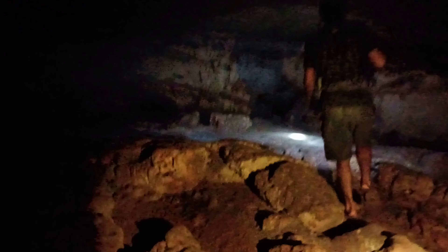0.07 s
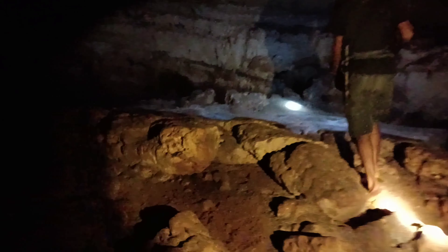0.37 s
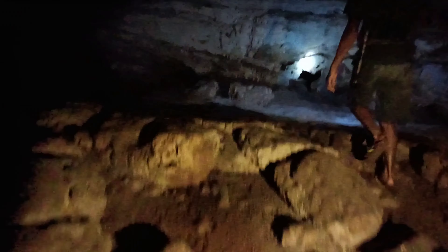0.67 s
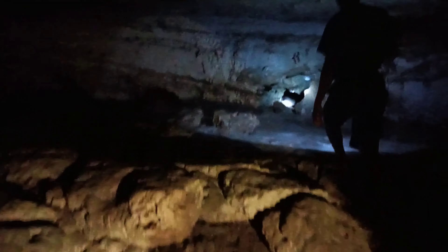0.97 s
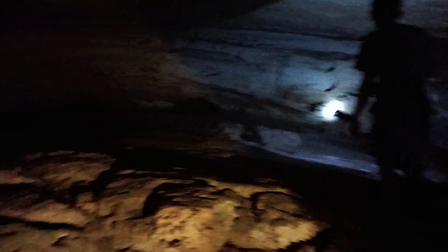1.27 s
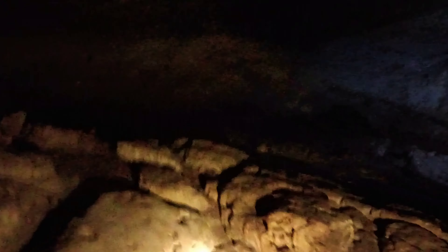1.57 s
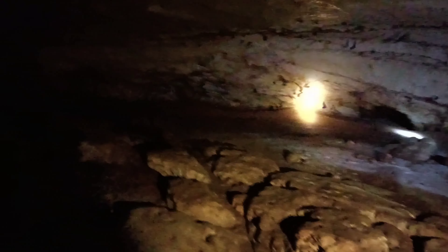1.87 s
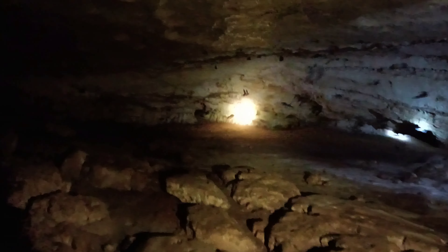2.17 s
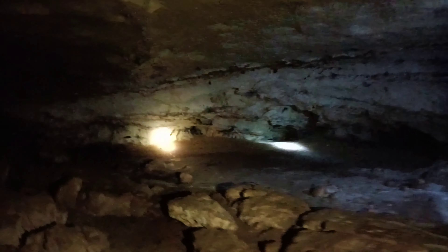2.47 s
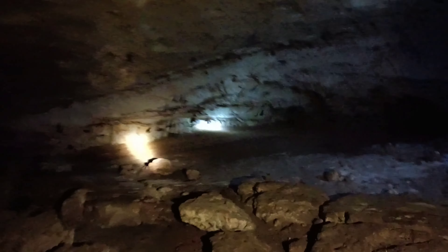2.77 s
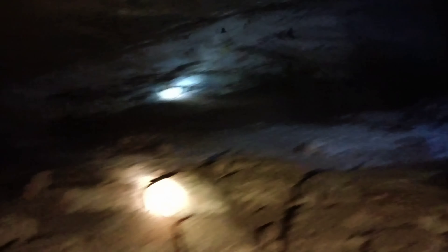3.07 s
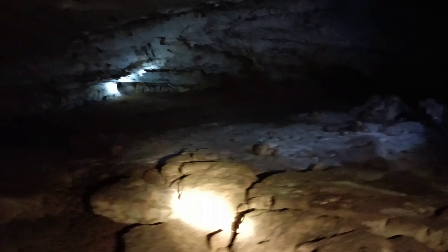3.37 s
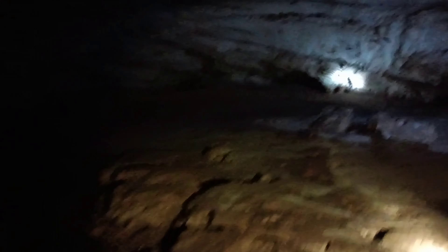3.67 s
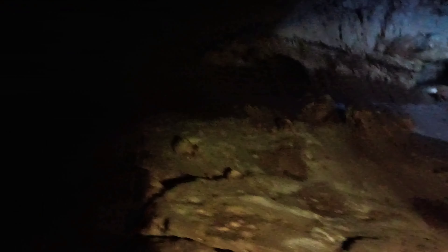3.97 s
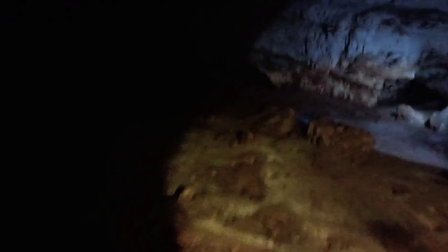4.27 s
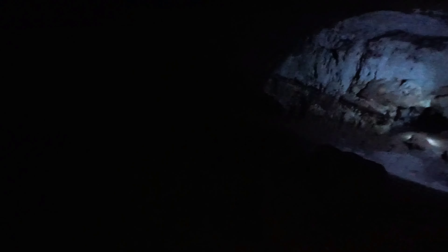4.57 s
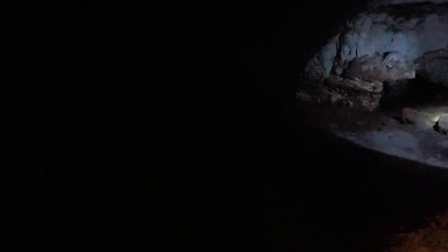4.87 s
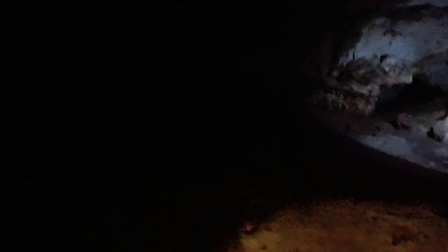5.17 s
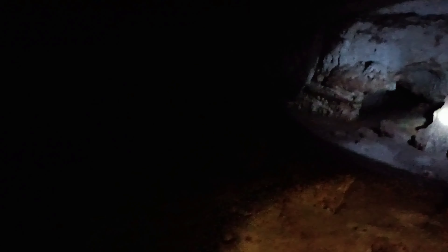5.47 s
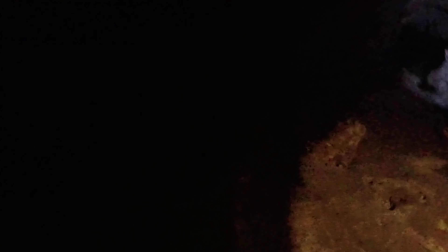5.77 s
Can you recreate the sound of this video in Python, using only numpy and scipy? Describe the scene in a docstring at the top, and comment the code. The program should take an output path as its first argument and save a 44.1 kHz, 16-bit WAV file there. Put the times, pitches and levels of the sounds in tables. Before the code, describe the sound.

Someone shifts on a loose rocky cave floor, with rustling clothing, gritty scrapes and stones clacking underfoot over a quiet rumble.

```python
"""Someone shifts about on the loose rock floor of a low cave, close to the microphone.
First clothing slides in thin whispers, with faint squeals, a few scuffs and the clack of small stones.
After three seconds the soles drag harder over the grit. Then three footfalls rock larger stones,
the second with a low boom, and it ends on small ticks and a last rustle of clothes.
All along, the cave answers stones and soles with a short, dark tail over a quiet rumble."""
import sys
import numpy as np
from scipy import signal
from scipy.fft import rfft, irfft
from scipy.io import wavfile
from scipy.ndimage import uniform_filter1d, map_coordinates

SR = 44100
rng = np.random.default_rng(int(sys.argv[2]) if len(sys.argv) > 2 else 0)


def dump_mix(stems):
    """Bounce the given channels to the path in sys.argv[1] as a 16-bit WAV at rate SR."""
    frames = np.atleast_2d(stems).T  # one column per channel
    limited = np.clip(frames, -1, 1)  # hard clip at full scale
    pcm = np.round(limited * 32767).astype(np.int16)
    wavfile.write(sys.argv[1], SR, pcm)


N = 261513

# tone colour of crushed grit: (frequency [Hz], level [dB])
GRIT_SPECTRUM = [(150, -25), (500, -6.5), (900, -13), (1500, -8.5), (2900, 3), (8000, -0.5), (14500, -4),
                 (16000, -24)]


def stone_knocks(lag_s=0.00021, crunch_t60=0.06, crunch_tilt_db=-4.5, contact_s=0.00016, low_hz=135):
    """A stone is driven against its bed: it rings briefly and crushes the grit beneath it."""
    # ringing modes of each stone: (frequency [Hz], level [dB], t60 [s])
    stone_modes = { "slab": [(172, -4.5, .09), (355, -14, .04), (485, 1.5, .038), (565, 2, .038),
                   (995, 3.5, .024), (1150, 3.5, .018)], "block": [(178, -3, .11), (280, -3, .05),
                   (430, -7, .03), (780, -6, .022), (1060, 2, .02), (1480, -3, .016)],
                   "plate": [(292, -15.5, .05), (499, -4, 0.054), (834, 2.5, 0.023), (1100, -6, 0.016),
                   (2120, -5.5, 0.02)], "cobble": [(638, -10, 0.2), (1800, -1, 0.03), (2340, 8, 0.028),
                   (2560, 8, 0.03), (3000, 6, 0.024)], "pebble": [(710, 0, .045), (3300, 2, .024),
                   (3560, 1, .022)], "chip": [(5750, 0, .014), (6300, 0, .01)], "flake": [(430, -6, 0.029),
                   (1065, 3, 0.03), (3700, -7, 0.025)], "lump": [(559, 11, 0.066)]}
    # stone hits: (time [s], stone, knock [dB], crunch [dB], cave send [dB])
    hits = [ (0.3605, "cobble", -35, -37.5, -8), (0.5205, "chip", -33, -49, -11),
            (1.404, "pebble", -64, -52.5, -1.5), (1.632, "lump", -60.5, -59, -9),
            (3.136, "pebble", -50, -55, -3), (3.966, "flake", -38.5, -39.5, -13),
            (4.0225, "block", -25.5, -27.5, -8.5), (4.3665, "slab", -30.5, -24, -12),
            (4.3711, "slab", -14.7, -21, -15.5), (4.985, "plate", -29.5, -33, -14),
            (4.9905, "plate", -25, -30.5, -13), (5.061, "pebble", -40, -44, -17),
            (5.632, "flake", -58, -54, -8), (5.707, "chip", -49, -58, -5),
            (5.855, "block", -51.5, -47.5, -13)]
    direct, send = np.zeros((2, 2, N))
    t = np.arange(SR // 2) / SR
    age = np.maximum(t - np.array([[0], [lag_s]]), 0)  # the left microphone is nearer
    low_cut = signal.butter(2, low_hz, "high", fs=SR)  # a stone radiates little bass
    for s, stone, knock_db, crunch_db, send_db in hits:
        ring = sum(amp(db - 60 * age / t60) * np.sin(2 * np.pi * hz * age)
                   for hz, db, t60 in stone_modes[stone])
        knock = amp(knock_db) * signal.lfilter(*low_cut, ring)
        grit = stereo(grains(len(t), spread_db=1), GRIT_SPECTRUM, crunch_tilt_db)
        crunch = patchy(grit, depth_db=3, width_hz=220, length_s=0.024)
        hit = knock + amp(crunch_db - 60 * t / crunch_t60) * crunch
        hit *= np.expm1(-age / contact_s)  # the force builds over the contact time
        add(direct, s, hit)
        add(send, s, amp(send_db) * hit)
    return direct + amp(3.5) * cave(send)


def footfall_boom(s=4.372, air_db=-38, rubble_db=-32, rubble_t60=0.62):
    """The heaviest footfall shakes the rubble and wakes the chamber's lowest air resonances."""
    # air resonances: (frequency [Hz], level [dB], t60 [s])
    modes = [(33.36, -1, 1.4), (38.9, 0.0, 1.4), (57.8, -2, 1.1)]
    # rubble tone: (frequency [Hz], level [dB])
    colour = [(90, -11), (190, 3), (280, -10.5), (410, -1.5), (580, -4.5), (800, -9.5), (1500, -29)]
    t, out = np.arange(SR) / SR, np.zeros((2, N))
    air = sum(amp(db - 60 * t / t60) * np.sin(2 * np.pi * hz * t) for hz, db, t60 in modes)
    rubble = stereo(rng.standard_normal((2, SR)), colour) * amp(-60 * t / rubble_t60)
    attack = np.minimum(t / 0.008, 1)
    add(out, s, (amp(air_db) * air + amp(rubble_db) * rubble) * attack)
    return out


def sole_scuffs(cave_db=-10):
    """Each drag swells and fades as a stream of gritty grains; weight on the sole adds a lower grind."""
    # drags: (time [s], rise [s], fade [s], level [dB], brightness [dB/octave], relative grind [dB])
    drags = [ (0.265, 0.012, 0.044, -54.5, 0, -41), (0.378, 0.019, 0.11, -42.5, 3, -12.5),
             (0.979, 0.008, 0.068, -44.3, 4, -18), (1.448, 0.03, 0.09, -50.5, 0, -24.5),
             (2.441, 0.035, 0.097, -54, -0.5, -3), (3.296, .009, .056, -36, 1.6, -26),
             (3.351, .003, .016, -44, 0, -3), (3.54, 0.037, 0.013, -45.5, 1.5, -47),
             (3.642, .007, .024, -47, 0, -25), (3.692, .016, .036, -47.5, 1, -22),
             (3.949, 0.084, 0.032, -38.5, 1, -13), (4.101, 0.1, 0.07, -53, -5.5, -9),
             (4.335, 0.056, 0.039, -37.5, 1, -5), (4.541, 0.096, 0.038, -43, 8, -9.5),
             (4.605, .03, .032, -57, 0, 5), (4.893, .006, .06, -60, 2, -25),
             (4.951, 0.003, 0.006, -49, 1, -27.5), (4.955, 0.057, 0.008, -41.5, 6, -4),
             (5.015, .038, .05, -42, 2, -12), (5.519, 0.022, 0.12, -57, 4.5, 0.5),
             (5.808, 0.042, 0.04, -50, 2.5, 5)]
    # tone of grit under weight: (frequency [Hz], level [dB])
    grind_spectrum = [(100, -20), (200, 9.5), (450, -12), (750, -9), (1300, 0), (2200, 0), (5000, -17.5)]
    t, out = np.arange(SR // 2) / SR, np.zeros((2, N))
    for s, rise, fade, db, tilt_db, grind_db in drags:
        pressure = np.where(t < rise, t / rise, np.exp(-((t - rise) / fade) ** 2))
        cracks = grains(len(t), spread_db=0.8)
        grit = stereo(cracks, GRIT_SPECTRUM, tilt_db) + amp(grind_db) * stereo(cracks, grind_spectrum)
        grit = patchy(grit, depth_db=3.4, width_hz=240, length_s=0.035)
        grit *= flutter(len(t), depth_db=1.4, per_s=150)
        add(out, s, amp(db) * pressure * grit)
    return out + amp(cave_db) * cave(out)


def cloth_slides(attack_s=0.018, release_s=0.095, reference_hz=11300, wander_share=.006):
    """Threads tick over threads: a high band of hiss whose pitch glides with the sliding speed."""
    # cloth over cloth: (start [s], length [s], level [dB], start pitch [Hz], end pitch [Hz])
    strokes = [ (-0.01, 0.2, -51.5, 11100, 11400), (0.26, 0.24, -49.5, 12400, 11100),
               (0.592, 0.31, -51.5, 11200, 10600), (0.962, 0.21, -48.5, 10900, 11000),
               (1.256, 0.43, -49, 11040, 11100), (1.774, 0.07, -53.5, 11600, 10900),
               (2.075, 0.058, -57, 10000, 10100), (2.17, 0.13, -55, 11100, 11600),
               (2.374, 0.36, -57, 11500, 9600), (2.85, 0.15, -59, 9850, 9500),
               (3.074, 0.21, -62, 11100, 11700)]
    # tone of the hiss at the reference pitch: (frequency [Hz], level [dB])
    hiss_spectrum = [(1500, -27), (2400, -14.5), (6500, -17), (8500, -11.5), (10200, -9), (10900, 1),
                     (11700, 0), (12800, -2.5), (17000, -7.5)]
    now = np.arange(N) / SR
    level, glide = np.zeros(N), []
    for s, length, db, start_hz, end_hz in strokes:
        age = np.maximum(now - s, 0)
        catch = np.minimum(age / attack_s, 1)
        let_go = np.exp(-np.maximum(age - length, 0) / release_s)
        level += amp(db) * catch * let_go
        glide += [(s, start_hz), (s + length, end_hz)]
    ticks = stereo(grains(N, spread_db=-3), [(1, 0)])  # flat spectrum
    hz, t, z = signal.stft(ticks, SR, nperseg=512)
    wander = unit(uniform_filter1d(rng.standard_normal(len(t)), size=8))  # the hand slides unevenly
    pitch = np.interp(t, *np.transpose(glide)) * (1 + wander_share * wander)
    z *= amp(curve_at(hiss_spectrum, hz[:, None] * reference_hz / pitch))
    hiss = signal.istft(z, SR, nperseg=512)[1][:, :N]
    hiss = patchy(hiss, depth_db=3.4, width_hz=170, length_s=.035)
    return hiss * level * flutter(N, depth_db=1.3, per_s=63)


def body_rustle():
    """Soft, broad crinkling of clothes and dust that swells and fades with each shift of the body."""
    # body shifts: (centre [s], half length [s], level [dB])
    shifts = [ (2.93, 0.3, -62), (3.401, 0.11, -53.5), (3.87, 0.19, -57.5), (4.157, 0.21, -55.5),
              (4.6, 0.15, -59.5), (5.297, 0.096, -59), (5.422, 0.032, -60.5), (5.673, 0.13, -63),
              (5.92, 0.092, -46.5)]
    crinkle = stereo(grains(N, spread_db=2.7), GRIT_SPECTRUM, tilt_db=1)
    crinkle = patchy(crinkle, depth_db=3, width_hz=250, length_s=.04)
    t = np.arange(N) / SR
    level = sum(amp(db) * np.exp(-((t - s) / half) ** 2) for s, half, db in shifts)
    return crinkle * level * flutter(N, depth_db=1.2, per_s=110)


def friction_squeals(sag_share=0.0198):
    """Stick and slip too unsteady for a clean tone: a narrow band that swells, sags and fades."""
    # sliding surfaces catch: (centre [s], half length [s], pitch [Hz], width [Hz], level [dB])
    catches = [ (0.89, 0.075, 10300, 900, -55.5), (1.492, 0.032, 3020, 400, -54),
               (2.097, 0.03, 10300, 800, -57.5), (2.6, .4, 2450, 200, -72.5), (2.9, .05, 2480, 200, -68),
               (3.06, .055, 2340, 140, -66.5), (3.01, .024, 5300, 450, -60),
               (3.263, 0.053, 10800, 600, -57)]
    t, out = np.arange(SR) / SR - .5, np.zeros((2, N))
    bins = np.fft.rfftfreq(SR, 1 / SR)
    for s, half, hz, width, db in catches:
        peak_db = -20 * np.log10(1 + (2 * (bins - hz) / width) ** 2)
        band = stereo(rng.standard_normal((2, SR)), np.column_stack([bins, peak_db]))
        # as the slide slows, the pitch drops by sag_share in each half length
        sag = np.exp(-1j * np.pi * hz * sag_share * t ** 2 / half)
        squeal = (signal.hilbert(band) * sag).real
        add(out, s - .5, amp(db) * np.exp(-(t / half) ** 2) * squeal)
    return out


def cave(x):
    """Dense reflections from near rock; the treble dies first."""
    # decay times: (frequency [Hz], t60 [s])
    t60 = [(100, 1.0), (450, 0.42), (1000, 0.32), (3000, 0.25), (12000, 0.15)]
    colour = [(80, -9.5), (430, 7.5), (3000, 9.0)]  # (frequency [Hz], level [dB])
    hz, t, z = signal.stft(stereo(rng.standard_normal((2, SR)), colour), SR, nperseg=256)
    decay = amp(-60 * t / curve_at(t60, hz)[:, None])
    tail = signal.istft(z * decay, SR, nperseg=256)[1]
    tail *= np.clip((np.arange(tail.shape[1]) / SR - .004) / 0.0035, 0, 1)  # pre-delay, then fade-in
    return signal.fftconvolve(x[:1], tail / np.linalg.norm(tail[0]), axes=1)[:, :N]


def still_air(rumble_db=-59, hiss_db=-72):
    """Low rumble of the chamber and a faint even hiss."""
    # chamber rumble: (frequency [Hz], level [dB])
    rumble_spectrum = [(20, -2.5), (40, 4), (80, -2), (190, -5), (450, -9.5), (700, -20), (3000, -27.5)]
    # faint even hiss: (frequency [Hz], level [dB])
    hiss_spectrum = [(1000, 0), (16000, -2)]
    rumble = stereo(rng.standard_normal((2, N)), rumble_spectrum)
    rumble *= flutter(N, depth_db=1.5, per_s=5.054)
    hiss = stereo(rng.standard_normal((2, N)), hiss_spectrum)
    return amp(rumble_db) * rumble + amp(hiss_db) * hiss


def grains(size, spread_db):
    """Thousands of tiny fractures a second: noise whose strength jumps every 16 samples."""
    strength = amp(spread_db * np.minimum(rng.exponential(1, size // 16 + 1), 5))
    return rng.standard_normal((2, size)) * np.repeat(strength, 16)[:size]


def patchy(x, depth_db, width_hz, length_s):
    """Ever-changing contact points: brief narrow resonances come and go across the spectrum."""
    hz, t, z = signal.stft(x, SR, nperseg=512)
    grid = np.array(np.meshgrid(hz / width_hz, t / length_s, indexing="ij"))
    patches = map_coordinates(rng.standard_normal((128, 256)), grid, order=1, mode="grid-wrap")
    z *= amp(depth_db * patches)
    return unit(signal.istft(z, SR, nperseg=512)[1][:, :x.shape[1]])


def flutter(size, depth_db, per_s):
    """Randomly wavering gain, as of a surface that catches and slips."""
    steps = np.arange(size) / SR * per_s
    return amp(depth_db * np.interp(steps, np.arange(4096), rng.standard_normal(4096)))


def stereo(pair, spectrum, tilt_db=0):
    """Colours two signals and sets their stereo width: centred bass, wide middle, narrower treble."""
    # likeness of left and right: (frequency [Hz], correlation [-1 to 1])
    likeness = [(60, .99), (220, .92), (500, .65), (1100, -.2), (5000, 0), (7500, .55), (12000, .72)]
    hz = np.fft.rfftfreq(pair.shape[1], 1 / SR)
    same = np.clip(curve_at(likeness, hz), -.999, .999)
    mid, side = rfft(pair) * np.sqrt([1 + same, 1 - same])
    colour = amp(curve_at(spectrum, hz) + tilt_db * np.log2(np.maximum(hz, 500)))
    return unit(irfft(np.array([mid + side, mid - side]) * colour, pair.shape[1]))


def amp(db):
    """Decibels to gain."""
    return 10 ** (np.asarray(db) / 20)


def unit(x):
    """Scales to rms 1."""
    return x / np.sqrt(np.mean(x ** 2) + 1e-20)


def curve_at(points, hz):
    """Reads a curve on a log-frequency axis."""
    f, value = np.transpose(points)
    return np.interp(np.log(hz + 1), np.log(f + 1), value)


def add(mix, s, sound):
    """Mixes a stereo sound in at time s."""
    part = mix[:, max(round(s * SR), 0):][:, :sound.shape[1]]
    part += sound[:, :part.shape[1]]


def scene():
    """Stones, boom and room tone, with the friction sounds panned to follow the body."""
    # where the moving body is: (time [s], left minus right [dB])
    body_pan = [(1, -2.5), (2.8, -1.5), (3.3, 3.5), (4.6, 0), (5, 3.5)]
    side_db = np.interp(np.arange(N) / SR, *np.transpose(body_pan))
    friction = sole_scuffs() + friction_squeals() + cloth_slides() + body_rustle()
    friction *= amp([side_db / 2, -side_db / 2])
    return stone_knocks() + footfall_boom() + friction + still_air()


def record(dry):
    """The recorder's band limit: a steep low-pass at the very top of the treble."""
    low_pass = signal.firwin(511, 15950, window=("kaiser", 9), fs=SR)
    return signal.oaconvolve(dry, low_pass[None], "same")


dry = scene()
out = record(dry)
dump_mix(out)
```